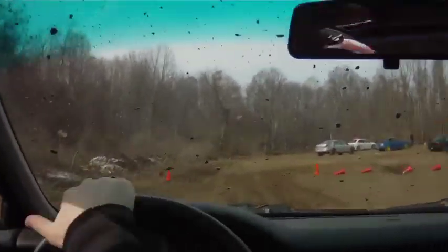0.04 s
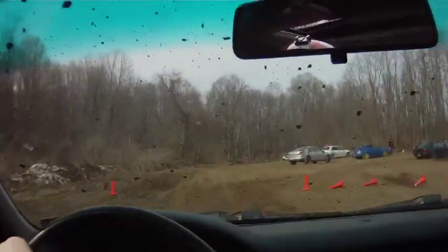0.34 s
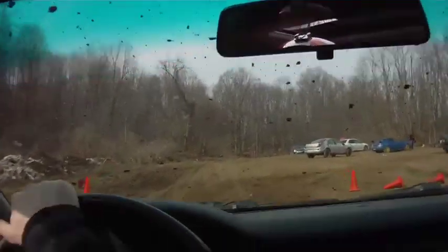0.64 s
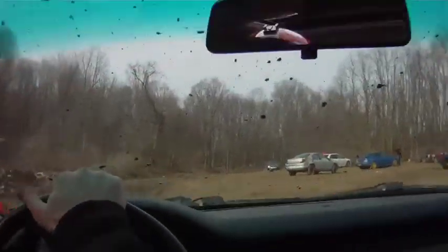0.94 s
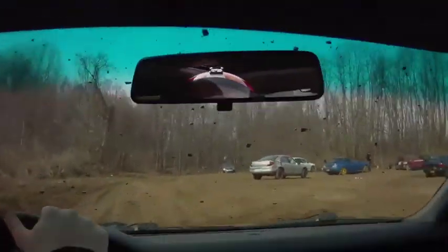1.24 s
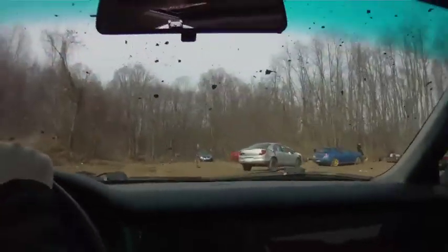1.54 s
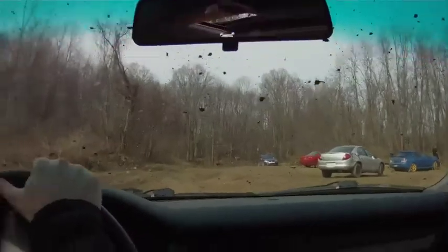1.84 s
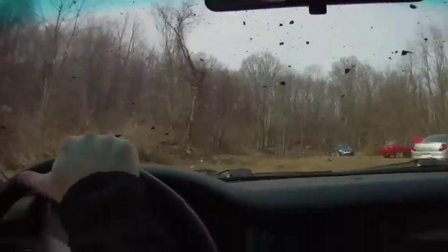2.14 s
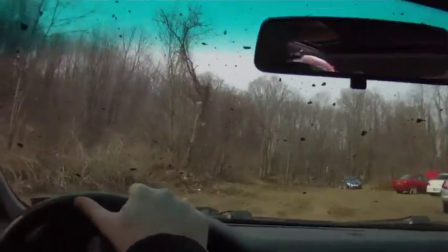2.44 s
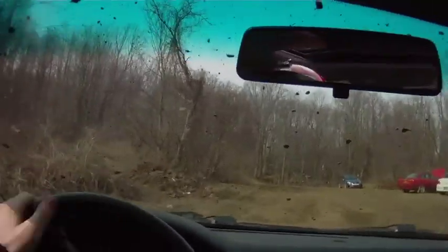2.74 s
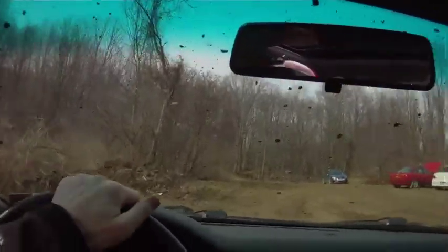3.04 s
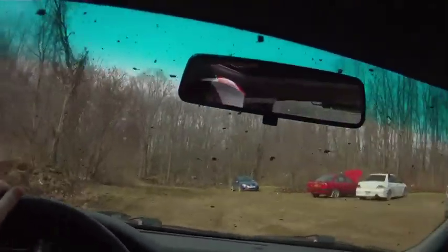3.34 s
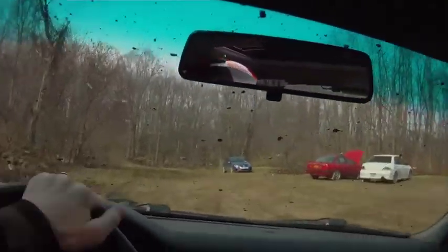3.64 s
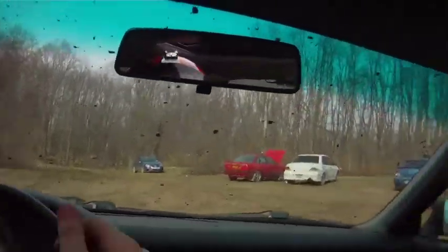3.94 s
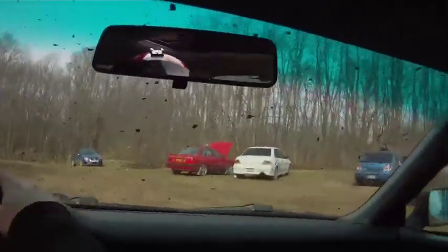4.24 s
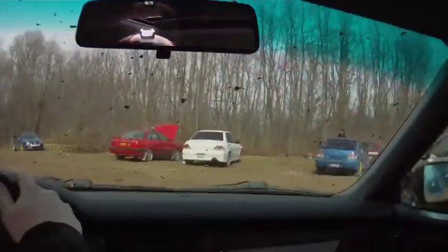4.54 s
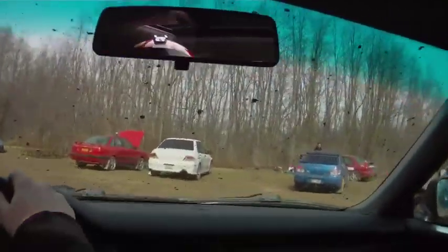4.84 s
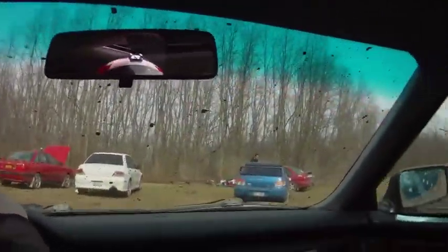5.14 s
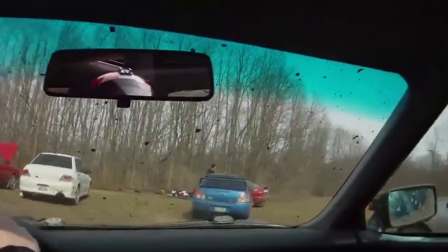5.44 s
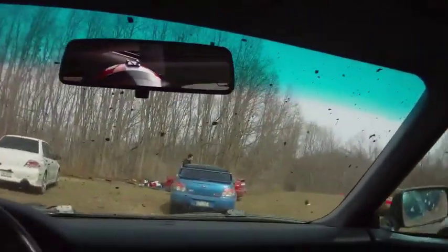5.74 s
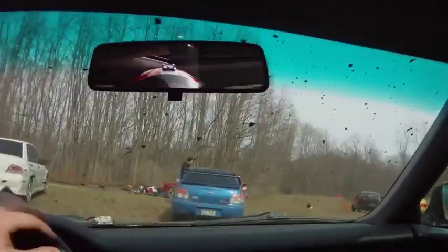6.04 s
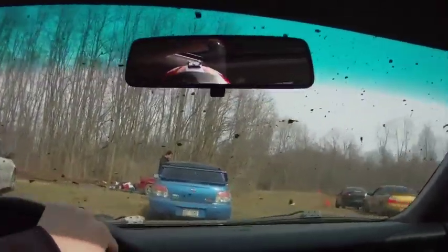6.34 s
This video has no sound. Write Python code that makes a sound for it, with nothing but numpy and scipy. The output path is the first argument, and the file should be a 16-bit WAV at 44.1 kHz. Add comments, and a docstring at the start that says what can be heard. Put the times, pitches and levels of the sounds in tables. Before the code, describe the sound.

Inside a car driving hard on dirt, tyres rumble, clods thump the underbody and trim rattles, then the pace eases.

```python
"""Tyres crunch and clods thump the floor, heard inside a car that slides round a dirt course and slows.
Clods and stones drive the panels into damped vibration; countless small impacts merge into tyre roar
and a spray of grit. Ruts heave the body on its springs and set the floor pan drumming, and jolts make
the trim chatter and squeak. Sharp plastic clicks sound very close, on either side.
Under it all the vents hiss; a faint whistle enters as the pace eases."""
import sys
import numpy as np
from scipy import signal
from scipy.fft import rfft, irfft, next_fast_len
from scipy.io import wavfile
from scipy.ndimage import uniform_filter1d, map_coordinates

SR = 44100
rng = np.random.default_rng(int(sys.argv[2]) if len(sys.argv) > 2 else 0)


def output_pcm(signal):
    """Save a mono or channel-first signal as 16-bit PCM at the path in sys.argv[1].

    Samples are clipped to [-1, 1] before scaling.
    """
    pcm = np.clip(np.atleast_2d(signal).T, -1, 1) * 32767
    wavfile.write(sys.argv[1], SR, np.round(pcm).astype(np.int16))


N = 286209
TIME = np.arange(N) / SR

# Spectral envelopes, each with columns: frequency_hz, gain_db
DUCT_SPECTRUM = [(1000, -36), (1700, -12.5), (1860, -1.5), (2230, -9), (2540, 0.5), (2890, -1), (3380, -12),
                 (3920, 2.5), (5080, -14), (5940, -12), (6500, -8.5), (8000, -18.5), (10400, -32),
                 (17600, -120)]  # dashboard ducts
HIGH_HISS_SPECTRUM = [(4000, -20.5), (6500, -3), (9000, -1.5), (12000, -1.5), (15500, -3)]  # faint, wide, steady high hiss
SIZZLE_SPECTRUM = [(8000, -5), (11100, -7), (11560, 8), (12100, -4), (13000, 0), (13900, 3), (15200, -6)]  # thin, very high sizzle
GRIT_SPECTRUM = [(2000, 2), (4000, 11.5), (5200, -2), (7000, 3), (9500, -7), (15000, -13)]  # grains on the body
PLASTIC_SPECTRUM = [(100, 20), (600, 16), (1200, 13), (2500, 8), (4000, 4), (7000, 0), (12000, -4.5),
                    (16000, -9)]  # snapping plastic
TRIM_SPECTRUM = [(400, -0.5), (700, 14.5), (1100, 3.5), (1300, -2.5), (1500, 2), (1900, 1), (2500, -1.5),
                 (2950, 0), (3450, -2), (4100, -0.5), (5000, -13), (8000, -19.5), (15000, -40)]  # loose trim panels
HEAVE_SPECTRUM = [(15, -0.5), (24, -5.5), (32, 3.5), (45, 4), (58, -0.5), (75, -5), (110, -10.5)]  # body shaking on its springs
LURCH_SPECTRUM = [(15, -6), (24, 0.5), (33, 6), (48, -0.5), (65, -9), (110, -21.5)]  # deep swing in a rut
FLOOR_SPECTRUM = [(70, -17), (105, -4), (150, 0), (190, -1.5), (240, -8.5), (400, -26)]  # drumming floor pan
SPRAY_SPECTRUM = [(600, -14.5), (900, 10), (1300, 0), (1500, 4.5), (1800, -2), (2500, 4.5), (3300, -1),
                  (4000, 0), (5000, -10), (7000, -13.5), (10000, -21), (15000, -32)]  # grit on the wheel wells
ROAR_SPECTRUM = [(70, -24.5), (115, 0.5), (180, 1), (245, -3.5), (310, 2.5), (380, 0), (480, 1.5),
                 (620, -3), (780, -11), (1000, -35), (1300, -41.5), (2200, -51.5)]  # tyres heard through the floor
WELL_SPECTRUM = [(60, -20), (130, -10.5), (200, 3.5), (300, -1), (420, 3), (600, -6.5), (900, -34),
                 (1400, -40), (3000, -56)]  # booming wheel well

# Levels below are relative within each table; the sources add their own gains.
# Ventilation hiss: time_s, level_db
HISS_LEVELS = [(0.0, -63.5), (1.66, -62.5), (1.84, -62), (2.4, -63), (2.86, -61), (3.13, -63), (4.9, -65.5),
               (5.45, -67), (5.7, -63.5), (6.49, -62)]
# Raspy whistle as the car slows: time_s, level_db
WHISTLE_LEVELS = [(2.5, -84), (2.64, -64), (2.9, -69), (3.14, -65), (3.25, -75), (3.36, -71), (3.48, -70),
                  (3.6, -73), (3.76, -66), (3.96, -78), (4.18, -74), (4.32, -92)]
# Tyre roar, following the pace from hard to easy: time_s, level_db
ROAR_LEVELS = [(0.0, -36), (0.23, -37.5), (1.16, -40), (1.48, -42), (2.0, -42), (2.58, -43), (3.43, -45.5),
               (4.28, -45), (4.48, -45), (6.07, -46.5), (6.49, -44.5)]
# Brief swishes and one long, thin high whine: start_s, length_s, level_db, centre_hz, width_octaves
NOISE_SWELLS = [(2.625, 0.073, -67, 4180, 0.35), (4.455, 0.5, -79, 6460, 0.083),
                (5.723, 0.085, -72, 4600, 0.72), (6.146, 0.11, -64.5, 4080, 0.31)]
# Handfuls of grit on the body: start_s, length_s, level_db
GRIT_SHOWERS = [(0.188, 0.01, -59), (0.432, 0.01, -61), (0.72, 0.01, -60), (0.892, 0.011, -66),
                (1.682, .01, -60), (2.408, 0.011, -68), (2.554, 0.023, -61), (2.584, 0.13, -68),
                (3.439, 0.038, -65), (4.364, 0.018, -68), (5.753, 0.085, -66.5)]
# Rubbing trim: start_s, level_db, pitch_hz, pitch_spread_ratio
TRIM_SQUEAKS = [(0.0847, -59, 9200, 0.032), (0.915, -58, 9650, .035), (0.9622, -59, 9950, .012),
                (1.1714, -63, 9750, .012), (1.221, -52, 9520, .028), (1.5998, -67, 9950, .025),
                (1.731, -66, 9730, .008), (1.8485, -62, 9800, .02), (2.505, -55, 9780, .01),
                (2.6434, -63, 9560, .02), (2.6858, -63, 9000, .03)]
# Impacts of a loose metal part: start_s, level_db, pitch_ratio
METAL_HITS = [(1.757, -46, 0.92), (1.951, -36.5, 1.08), (4.039, -45.5, 0.924), (4.234, -55, 0.83)]
# Its modes at a pitch ratio of 1: frequency_hz, level_db, t60_s
METAL_MODES = [(2450, -17, 0.019), (2900, -25, 0.02), (3260, -3, 0.036), (3390, -10, 0.046),
               (3970, -32, .025)]
# Plastic slips, with later ticks relative to them: start_s, level_db, tick_offset_db, tick_delay_s
PLASTIC_SNAPS = [(0.0460, -30.5, -8, 0.0033), (0.5669, -31.5, -6, 0.0046), (0.6985, -73, -14, .002),
                 (0.753, -37, -2, .0025), (0.7666, -36.5, 1, 0.0037), (1.0878, -28.5, -7, .0038),
                 (1.0940, -32, -12, .003), (1.104, -31, -13, 0.0031), (1.1073, -31.5, -6, .005),
                 (1.138, -35.5, 1, 0.0039), (1.1678, -36, -12, .002), (1.7993, -33, -2.5, 0.0031),
                 (1.892, -44, 9.5, 0.0016), (1.955, -38, 0, 0.0028)]
# Jolts that shake the trim: start_s, level_db, tilt_db_per_octave
TRIM_JOLTS = [(0.046, -58, 3), (0.675, -30, -0.5), (0.696, -37, 5), (0.727, -29, -0.5), (0.756, -32.5, 0.5),
              (0.807, -33, 1), (0.99, -23.5, -11.5), (1.06, -33.5, 1), (1.087, -42, 10),
              (1.107, -23.5, -4.5), (1.134, -28.5, -2), (1.277, -25.5, -4.5), (1.798, -40, 0.5),
              (1.842, -35.5, 1), (1.879, -41.5, 1), (1.947, -23.5, -3), (2.008, -32, -5.5), (4.04, -46, 3),
              (4.097, -44, 0), (4.213, -43.5, 2), (6.122, -45, 3)]
# Ruts that rock the body: deepest_s, heave_db, drumming_db
GROUND_RUTS = [(0.04, -52, -56), (0.55, -49, -47), (0.76, -40.5, -52), (1.14, -34.5, -46.5),
               (1.42, -43.5, -53), (1.79, -37.5, -56), (1.93, -36.5, -55), (2.07, -50, -59),
               (2.22, -40, -47), (3.48, -44, -64), (4.08, -48, -48), (4.27, -41.5, -47.5), (5.17, -47, -59),
               (5.56, -66, -51.5), (5.68, -48, -56.5)]
# Stones on a stiff panel: start_s, level_db, pitch_hz
STONE_HITS = [(0.675, -53, 910), (0.692, -37, 516), (0.703, -38, 487), (1.1077, -22.5, 546),
              (1.277, -35.5, 695), (1.283, -41, 890), (1.289, -30, 553), (1.302, -28, 470),
              (1.521, -47, 500), (1.95, -25.5, 523)]
# Big clods and stones on the underbody: start_s, level_db, pitch_hz, judder_offset_db
CLOD_HITS = [(0.04, -30, 293, 3.5), (0.396, -31.5, 369, 4.5), (0.456, -27.5, 287, -3),
             (0.491, -33, 204, -14), (0.564, -20.5, 273, -4), (0.690, -19, 378.5, -2),
             (0.729, -29, 321, -11), (0.756, -31, 232, 0), (0.916, -24.5, 287, 3), (0.991, -17, 289.4, 2),
             (1.02, -26.5, 220, -11), (1.047, -25, 279, -4), (1.062, -22.5, 331, 1),
             (1.079, -23.5, 304, -4), (1.106, -16.5, 342.3, 1), (1.132, -25, 228, -10),
             (1.164, -23.5, 360, -10), (1.236, -31, 338, 8.5), (1.381, -36, 234, 8),
             (1.45, -28.5, 267, -1.5), (1.75, -34.5, 231, 2), (1.947, -14.5, 319, -3.5),
             (2.007, -25, 291, -6), (2.176, -24, 359.5, -1.5), (2.207, -31.5, 299, -7),
             (2.23, -21, 327, -0.5), (2.406, -24.5, 373, 1.5), (2.89, -26.5, 375.4, 1), (3.25, -36, 377, 2),
             (3.52, -38, 514, 2), (3.656, -36.5, 436, 6.5), (3.695, -39, 488, 1), (3.836, -31, 300, -2),
             (3.886, -33.5, 461, -2), (3.944, -38, 438, -16), (4.036, -31, 312.5, 4.5),
             (4.087, -32, 211, 0), (4.154, -29, 360, -1.5), (4.223, -31.5, 308.4, 5),
             (4.281, -33, 374, 4.5), (4.4, -36, 384.5, 4.5), (4.568, -42.5, 278, 5.5),
             (4.717, -38.5, 396, 3), (4.924, -32, 371, 0), (5.099, -29.5, 331, -2), (5.36, -35, 397, 3.5),
             (5.494, -29.5, 385, 0), (5.532, -28, 303, -7), (5.56, -39, 190, -10), (5.624, -30.5, 385, -6),
             (5.663, -25.5, 330, 2.5), (5.886, -33.5, 392.6, 3), (6.123, -37.5, 490, 6),
             (6.231, -34.5, 473, -0.5)]


def undb(db):
    """Amplitude ratio of a level in decibels."""
    return 10 ** (np.asarray(db) / 20)


def unit(x):
    """Normalisation to an rms of 1."""
    return x / np.sqrt(np.mean(x ** 2) + 1e-24)


def colour(x, points):
    """Minimum-phase filter through (Hz, dB) points, falling 12 dB per octave beyond them."""
    n = x.shape[-1]
    size = 2 * next_fast_len(n)
    hz, db = np.transpose(points)
    log_hz = np.log(np.maximum(np.arange(size // 2 + 1) * SR / size, 1))
    outside = np.maximum(np.log(hz[0]) - log_hz, 0) + np.maximum(log_hz - np.log(hz[-1]), 0)
    cepstrum = irfft(np.log(undb(np.interp(log_hz, np.log(hz), db))) - 2 * outside)
    cepstrum[1:size // 2] *= 2  # folding onto positive time makes the filter causal
    cepstrum[size // 2 + 1:] = 0
    return irfft(rfft(x, size) * np.exp(rfft(cepstrum)))[..., :n]


def walk(rate_hz):
    """Random modulation: Gaussian values joined by straight lines."""
    hop = int(SR / rate_hz)
    count = N // hop + 2
    return np.interp(TIME, np.arange(count) * hop, rng.standard_normal(2000)[:count])


def grains(per_s, spread_db, size=N):
    """Shot noise: tiny impacts at random times, of log-normal strength."""
    impulses = (rng.random(size) < per_s / SR) * rng.choice([-1, 1], size)
    return unit(impulses * undb(spread_db * rng.standard_normal(size)))


def rasp(hz, octaves, size):
    """Resonance: dense impulses ring in one band, 6 dB down at `octaves` to either side."""
    band = [(hz * 2 ** (k * octaves), -6 * abs(k) ** 1.5) for k in range(-3, 4)]
    return unit(colour(grains(4000, spread_db=2.5, size=size), band))


def wavering(hz, spread, size):
    """Rapid random frequency modulation roughens a tone."""
    drift = unit(uniform_filter1d(rng.standard_normal(size), size=60))
    return np.sin(2 * np.pi * np.cumsum(hz * (1 + spread * drift)) / SR)


def fade(t, t60):
    """Exponential decay by 60 dB in t60 seconds."""
    return np.exp(-np.log(1000) * t / t60)


def pulse(t, rise_s):
    """Critically damped envelope, peaking at 1 after rise_s."""
    return t / rise_s * np.exp(1 - t / rise_s)


def add(out, start_s, sound):
    """Superposition of a sound on the mix."""
    i = max(int(start_s * SR), 0)
    out[:, i:i + sound.shape[-1]] += sound[..., :N - i]


def over_ruts(db, rut_db, drumming=False, sigma_s=0.062):
    """Power sum, in dB, of a running level and Gaussian swells set by each rut's heave or drumming."""
    swells = np.zeros(N)
    for deepest_s, heave_db, drumming_db in GROUND_RUTS:
        peak_db = (drumming_db if drumming else heave_db) + rut_db
        swells += undb(peak_db) * np.exp(-.5 * ((TIME - deepest_s) / sigma_s) ** 2)
    return 20 * np.log10(np.hypot(undb(db), swells))


def high_hiss():
    """Partial correlation between left and right makes a faint, steady high hiss sound wide."""
    mid, side = unit(colour(rng.standard_normal((2, N)), HIGH_HISS_SPECTRUM))
    wide = mid + undb(-4.5) * side * np.array([[1], [-1]])
    return undb(-76.5 + 0.87 * walk(25)) * wide


def vent_hiss(gain_db=-1.9):
    """Flow noise: air hisses evenly through the dashboard ducts."""
    duct_db = np.interp(TIME, *np.transpose(HISS_LEVELS)) + gain_db + .6 * walk(9)
    return unit(colour(rng.standard_normal(N), DUCT_SPECTRUM)) * undb(duct_db)


def sizzle(level_db=-76, period_s=.1, first_s=.025, sigma_s=.009, hold_from_s=4.5, hold_to_s=4.9):
    """Amplitude modulation of very high noise gives soft, even ticks that once run together."""
    offset_s = (TIME - first_s + period_s / 2) % period_s - period_s / 2
    ticks = np.exp(-.5 * (offset_s / sigma_s) ** 2)
    held = undb(-0.5) * ((TIME > hold_from_s) & (TIME < hold_to_s))
    noise = unit(colour(rng.standard_normal(N), SIZZLE_SPECTRUM))
    return undb(level_db) * np.maximum(ticks, held) * noise


def whistle(centre_hz=2535, octaves=0.057, wander_ratio=0.00917):
    """Narrow-band noise is heard as a rough whistle; modulation makes it wander and flutter."""
    flutter_db = walk(22) + 1.8 * walk(160)
    pitch_ratio = 1 + wander_ratio * walk(14)
    tone = map_coordinates(rasp(centre_hz, octaves, N), [np.cumsum(pitch_ratio)], mode="mirror")
    return undb(np.interp(TIME, *np.transpose(WHISTLE_LEVELS)) + flutter_db) * tone


def swishes_and_whine():
    """Band-limited noise: broad swishes on loose ground; a faint, thin whine during the held sizzle."""
    out = np.zeros((2, N))
    for start_s, length_s, db, hz, octaves in NOISE_SWELLS:
        n = int(length_s * SR)
        add(out, start_s, undb(db) * np.sqrt(np.hanning(n)) * rasp(hz, octaves, n))
    return out


def grit():
    """Bursts of shot noise: loose grains land on the body in prickly showers."""
    out = np.zeros((2, N))
    for start_s, length_s, db in GRIT_SHOWERS:
        n = int(length_s * SR)
        shower = grains(3000, spread_db=3.5, size=n) * np.sqrt(np.hanning(n))
        add(out, start_s, undb(db) * unit(colour(shower, GRIT_SPECTRUM)))
    return out


def squeaks(gain_db=-1, rise_s=0.0031):
    """Stick-slip friction in the trim gives brief, thin, unsteady tones."""
    out, t = np.zeros((2, N)), np.arange(int(0.063 * SR)) / SR
    for start_s, db, hz, spread in TRIM_SQUEAKS:
        add(out, start_s, undb(db + gain_db) * wavering(hz, spread, len(t)) * pulse(t, rise_s))
    return out


def clinks():
    """Damped modes: a metal part clacks and buzzes in its seat, its pitch set by how it lands."""
    out, t = np.zeros((2, N)), np.arange(int(.1 * SR)) / SR
    for start_s, db, pitch_ratio in METAL_HITS:
        ring = sum(undb(mode_db) * wavering(hz * pitch_ratio, spread=0.046, size=len(t)) * fade(t, t60)
                   for hz, mode_db, t60 in METAL_MODES)
        add(out, start_s, undb(db) * ring)
    return out


def clicks(gain_db=2, slip_gap_s=0.00076, tick_gap_s=0.0006, step_db=-1.5):
    """Impulsive slip: very close plastic snaps in three slips on one side, then ticks on the other."""
    out, steps = np.zeros((2, N)), np.arange(3)
    for start_s, db, tick_db, tick_delay_s in PLASTIC_SNAPS:
        near, far = rng.permutation(2 * np.eye(2))[..., None]  # left and right in random order
        slips = (near, 0, steps * slip_gap_s)
        ticks = (far, tick_db, tick_delay_s + steps * tick_gap_s)
        for channel, run_db, delays_s in slips, ticks:
            for step, delay_s, (jitter, strength) in zip(steps, delays_s, rng.uniform(-1, 1, (3, 2))):
                impulse_db = db + gain_db + run_db + step * step_db + 1.1 * strength
                impulse = undb(impulse_db) * rng.choice([-1, 1]) * channel
                add(out, start_s + delay_s + jitter * slip_gap_s / 2, impulse)
    return colour(out, PLASTIC_SPECTRUM)


def chatter(gain_db=-9, rise_s=0.002, t60_s=0.095):
    """Repeated contact: loose panels buzz against each other, the bigger ones sounding duller."""
    out, t = np.zeros((2, N)), np.arange(int(.2 * SR)) / SR
    envelope = fade(t, t60_s) * (1 - np.exp(-t / rise_s))
    for start_s, db, tilt in TRIM_JOLTS:
        contacts = grains(12000, spread_db=1, size=len(t))
        spectrum = [(hz, band_db + tilt * np.log2(hz)) for hz, band_db in TRIM_SPECTRUM]
        add(out, start_s, undb(db + gain_db) * unit(colour(contacts, spectrum)) * envelope)
    return out


def heave(db, spectrum):
    """Mass on a spring: the body shakes on its suspension and the cabin air booms."""
    shake = unit(colour(rng.standard_normal(N), spectrum))
    # the dampers even out the strongest and weakest swings
    running_rms = np.sqrt(uniform_filter1d(shake ** 2, int(.13 * SR)))
    return shake / running_rms * undb(db)


def floor_boom(db):
    """Forced plate vibration: jolts from the suspension set the floor pan drumming."""
    return unit(colour(grains(600, spread_db=3.0), FLOOR_SPECTRUM)) * undb(db)


def spray(db):
    """Dense impacts fuse into steady noise as grit is flung against the wheel wells."""
    stream = unit(colour(grains(7000, spread_db=5.0), SPRAY_SPECTRUM))
    return stream * undb(db + 3.0 + 0.7 * walk(30))


def tyres(db):
    """Transmission loss: tread crushes soil in uneven patches, and the floor passes the dull part."""
    patches_db = 0.33 * walk(45) + .5 * walk(23)
    return unit(colour(grains(2000, spread_db=2.5), ROAR_SPECTRUM)) * undb(db + 0.4 + patches_db)


def knocks(rise_s=0.0016):
    """Heavy damping: a stiff panel struck by a stone swings for only a few cycles."""
    out, t = np.zeros((2, N)), np.arange(int(.04 * SR)) / SR
    for start_s, db, hz in STONE_HITS:
        add(out, start_s, undb(db) * np.sin(2 * np.pi * hz * t) * pulse(t, rise_s))
    return out


def clod(hz, judder_db=0, cycles=2.37, panel_db=-7, panel_ratio=1.12, well_db=-10, t60_s=0.21):
    """Forced, then free vibration: a clod dents a panel, which judders as the wheel well booms."""
    t = np.arange(int(.25 * SR)) / SR
    age = t * hz / cycles  # time in units of the dent's length
    dent = np.sin(2 * np.pi * hz * t) * (2 * age) ** 2 * np.exp(2 - 4 * age)
    judder = wavering(hz * panel_ratio, spread=0.2, size=len(t))
    panel = undb(panel_db) * judder * (1 - np.exp(-age ** 2))
    boom = unit(colour(rng.standard_normal(len(t)), WELL_SPECTRUM))
    well = undb(well_db) * boom * (1 - np.exp(-t / 0.0045))
    return undb(judder_db) * (panel + well) * fade(t, t60_s) - dent


def small_clods(roar_db, per_s=6, gain_db=2, spread_db=4, centre_hz=396.4, spread_octaves=0.322):
    """Impact strength grows with speed: small clods patter irregularly, following the tyre roar."""
    out = np.zeros((2, N))
    for slot, (jitter, strength, pitch) in enumerate(rng.uniform(-1, 1, (int(per_s * N / SR), 3))):
        start_s = (slot + .5 + jitter / 2) / per_s
        db = np.interp(start_s, TIME, roar_db) + gain_db + spread_db * strength
        add(out, start_s, undb(db) * clod(centre_hz * 2 ** (spread_octaves * pitch)))
    return out


def thumps(gain_db=-2, rebound_s=.012, rebound_db=-9.5, rebound_ratio=1.3):
    """Inelastic collision: each big clod hits the floor and rebounds once, softer and higher."""
    out = np.zeros((2, N))
    for start_s, db, hz, judder_db in CLOD_HITS:
        add(out, start_s, undb(db + gain_db) * clod(hz, judder_db))
        rebound = clod(hz * rebound_ratio, judder_db)
        add(out, start_s + rebound_s, undb(db + gain_db + rebound_db) * rebound)
    return out


def scene():
    """Superposition between the front seats; the pace sets heave, roar and spray together."""
    roar_db = np.interp(TIME, *np.transpose(ROAR_LEVELS))
    pace_db = roar_db + 39.5  # zero when driven hard
    heave_db = -43 + 1.43 * pace_db
    spray_pace_db = 1.13 * pace_db
    body = heave(heave_db, HEAVE_SPECTRUM)
    body += heave(over_ruts(heave_db - 11, rut_db=-1.5), LURCH_SPECTRUM)
    body += floor_boom(over_ruts(roar_db - 17.5, rut_db=2.5, drumming=True))
    ground = tyres(over_ruts(roar_db - 1.6, rut_db=-7))
    ground += spray(over_ruts(spray_pace_db - 61.5, rut_db=spray_pace_db - 23))
    background = vent_hiss() + high_hiss() + whistle() + sizzle()
    rattles = chatter() + clinks() + clicks() + squeaks()
    debris = thumps() + knocks() + grit()
    return background + swishes_and_whine() + rattles + body + ground + small_clods(roar_db) + debris


def record(dry, cutoff_hz=15600):
    """A steep elliptic low-pass filter removes the highest treble."""
    return signal.sosfilt(signal.ellip(8, .2, 70, cutoff_hz, fs=SR, output="sos"), dry)


dry = scene()
out = record(dry)
output_pcm(out)
```